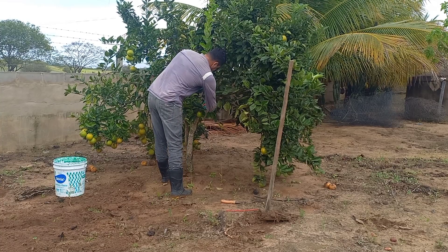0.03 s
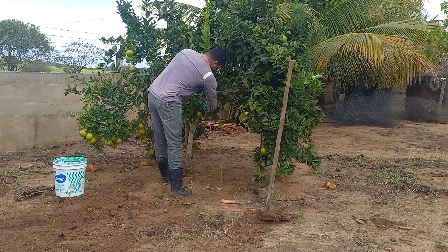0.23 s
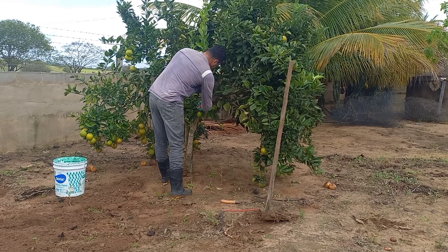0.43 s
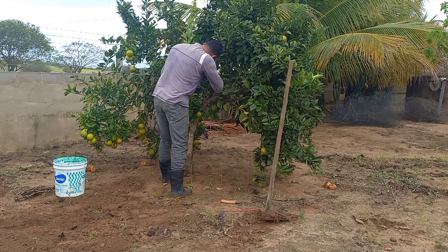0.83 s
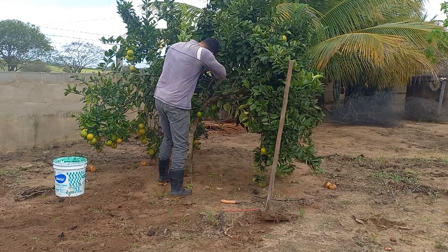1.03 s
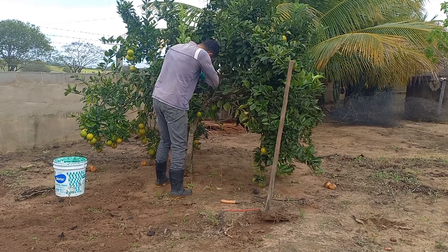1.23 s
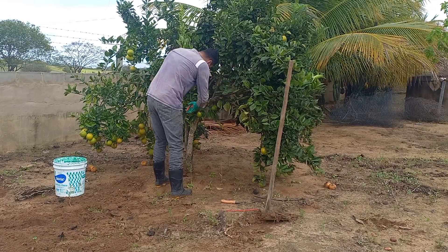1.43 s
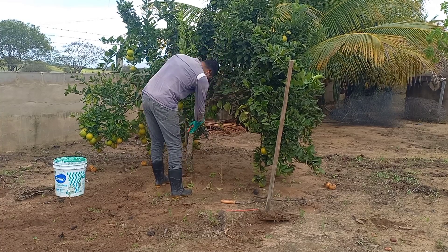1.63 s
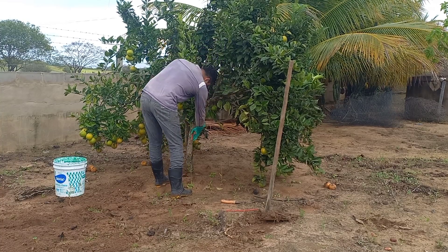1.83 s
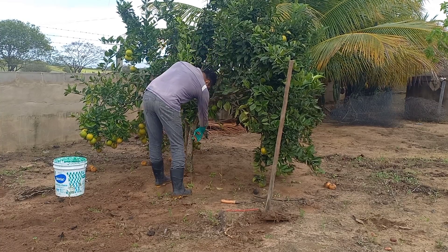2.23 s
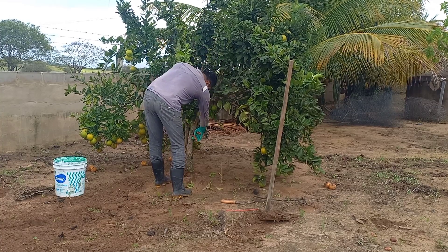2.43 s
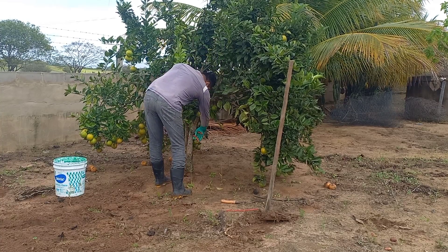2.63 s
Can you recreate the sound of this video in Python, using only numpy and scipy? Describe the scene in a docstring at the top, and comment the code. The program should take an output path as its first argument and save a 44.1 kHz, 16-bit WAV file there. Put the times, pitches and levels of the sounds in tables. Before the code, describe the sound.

A tree branch snaps once with a sharp crack right at the start, echoing briefly in an open yard. Small birds peep faintly throughout, leaves rustle softly near the end, and light wind rumbles on the microphone.

```python
"""A branch snaps once in a yard: its fibres tear, it cracks, and the ground, a wall and the foliage answer.
Leaves tick and rustle as the branch is handled. Small birds, probably chicks, peep all the while,
each note a quick whistle that leaps up and sags back. Light wind rumbles on the two microphone
ports (the openings that let sound in), over a faint hiss of air."""
import sys
import numpy as np
from scipy import signal
from scipy.fft import rfft, irfft, next_fast_len
from scipy.io import wavfile
from scipy.ndimage import uniform_filter1d, map_coordinates

SR = 44100
rng = np.random.default_rng(int(sys.argv[2]) if len(sys.argv) > 2 else 0)


def master(y):
    """Save y as 16-bit WAV."""
    cut = np.clip(np.atleast_2d(y).T, -1, 1)
    pcm = np.round(cut * 32767)  # scale
    wavfile.write(sys.argv[1], SR, pcm.astype(np.int16))


N = 123479

# How strongly the leaves are brushed. Each row: time in seconds, relative level in dB.
RUSTLE_LEVELS = [(.4, -68.5), (1, -73.5), (1.25, -69.5), (1.55, -67.5), (1.8, -70), (2.19, -66.5),
                 (2.24, -63), (2.355, -63), (2.385, -65.5), (2.52, -72), (2.62, -76.5)]
# The tone colours of leaves, still air and wind. Each row: frequency in Hz, relative level in dB.
LEAF_COLOUR = [(500, -6.5), (2000, -4.5), (4500, -0.5), (7000, -1.5), (8600, 3), (10500, 1), (14000, 3),
               (16000, -3.5)]
AIR_COLOUR = [(180, -9.5), (300, 6), (431, -4), (922, -13.5), (1870, -14.5), (2440, -13), (2790, -12),
              (3400, -22.5), (6680, -18), (8700, -18.5), (10300, -28), (13600, -34), (15500, -17.5)]
WIND_COLOUR = [(20, -21), (40, -12.5), (65, 4), (100, 3.5), (160, -9.5), (250, -22), (400, -39),
               (800, -60.5), (2000, -81.5)]
# Stereo width of the background hiss. Each row: frequency in Hz, gain in dB on the difference between left and
# right.
HISS_WIDTH = [(4400, 1.5), (8000, -1.5), (15000, -15.5)]
# Gusts on the left and right port. Each row: time in seconds, relative level in dB.
GUSTS_LEFT = [(0.0, -60), (0.26, -46.5), (0.39, -64), (0.5, -40.5), (0.73, -61.5), (1.29, -58.5),
              (1.5, -48), (1.65, -59.5), (1.99, -56), (2.03, -33), (2.09, -50.5), (2.16, -36.5),
              (2.23, -42), (2.4, -63), (2.79, -59)]
GUSTS_RIGHT = [(0, -73), (.05, -45), (.16, -40), (.39, -53), (.48, -35), (.51, -54), (.545, -35),
               (.61, -36.5), (.65, -47), (.71, -47), (.75, -53.5), (.78, -35.5), (.81, -46), (.85, -33),
               (.92, -49), (.94, -41), (.99, -56.5), (1.09, -35), (1.13, -51), (1.31, -45.5), (1.34, -37.5),
               (1.39, -27), (1.41, -48.5), (1.48, -40), (1.5, -56.5), (1.55, -33), (1.69, -51),
               (1.74, -42.5), (1.83, -48.5), (1.91, -50.5), (1.955, -31), (2, -30), (2.05, -43.5),
               (2.07, -32), (2.14, -44), (2.29, -29.5), (2.31, -39.5), (2.34, -34.5), (2.37, -59),
               (2.39, -28.5), (2.46, -50), (2.49, -27.5), (2.53, -34), (2.61, -51), (2.67, -42.5),
               (2.79, -47)]
# The near birds' notes. Each row: start in seconds, length in seconds, top pitch in Hz,
# relative level in dB, swell from the middle to the end in dB.
PEEPS = [(.005, 0.09, 3580, -62, 0.5), (.095, .088, 3876, -60, 1), (.3, 0.065, 3500, -53.5, -2),
         (.408, 0.053, 2750, -59, -4), (.482, .066, 3180, -58.5, 1), (.584, 0.065, 3210, -63, -4),
         (.662, 0.068, 3640, -58.5, 0), (.765, 0.1, 3740, -61, -1.5), (.857, 0.099, 3940, -55.5, 1),
         (.95, 0.082, 3730, -56.5, 2), (1.07, 0.1, 3843, -58.5, 0), (1.135, 0.067, 3060, -57, 4.5),
         (1.275, 0.047, 3160, -57, 4), (1.317, 0.062, 2840, -51.5, 2), (1.5, 0.072, 3336, -55.5, -1.5),
         (1.695, 0.083, 3660, -63.5, 3), (1.895, 0.11, 3920, -66, 2), (1.93, 0.022, 2626, -56.5, 5),
         (2.09, 0.088, 3500, -68, -1), (2.295, 0.076, 3340, -61.5, 5), (2.485, 0.084, 2870, -66, 0),
         (2.7, 0.07, 3200, -76.5, 0.5)]
# The pitch path of a peep. Each row: share of its length, share of its pitch rise.
PEEP_SHAPE = [(0, 0), (.13, .45), (.29, .92), (.43, 1), (.6, .92), (.78, .48), (1, .15)]
# The tone colour of the birds' voices. Each row: frequency in Hz, gain in dB.
PEEP_COLOUR = [(1400, -29), (1650, -24), (1830, -12.5), (2000, -20.5), (2400, -16), (2750, -5), (3050, -12),
               (3300, -16.5), (3700, -10), (4000, -14)]
# How long the yard rings. Each row: frequency in Hz, seconds to fade by 60 dB (called T60).
YARD_DECAY = [(200, 0.31), (1000, 0.31), (2500, 0.23), (5000, .22), (15000, 0.19)]
# The tone colour of that ringing. Each row: frequency in Hz, relative level in dB.
YARD_COLOUR = [(200, 14), (500, 13), (1200, -3), (3000, -3.5), (8000, -5.5), (15000, 0.5)]
# Twig and leaf ticks. Each row: start in seconds, level in dB, centre frequency in Hz,
# width in octaves, T60 in seconds.
TICKS = [(.048, -53, 7500, 0.2, 0.034), (.064, -58.5, 6900, 0.16, 0.022), (.086, -60.5, 8300, 0.44, 0.069),
         (.165, -68, 8540, 0.15, 0.026), (0.284, -46, 1806, 0.14, 0.016), (0.681, -66.5, 7800, 0.95, 0.059),
         (1.547, -62, 1990, 1.3, 0.057), (2.325, -52, 11000, 2, 0.13)]
# The tone colour of tearing fibres. Each row: frequency in Hz, relative level in dB.
TEAR_COLOUR = [(1000, -1.0), (3500, -6), (12000, 7.5)]
# Bundles of fibres part one after another. Each row: time in seconds, strength in dB.
FIBRE_BREAKS = [(.2091, -12), (.2095, -4.5), (.2107, -11)]
# The resonances of the breaking wood. Each row: frequency in Hz, relative level in dB.
WOOD_COLOUR = [(180, -26), (300, -22), (500, -24), (800, -26), (1050, -11.5), (1300, -16), (1550, -6),
               (1800, -5), (2100, -14), (2600, -1), (3800, 1), (4450, -2), (5400, 2), (6550, -7.5),
               (7750, 3.5), (8250, 0.5), (8680, 4), (9100, -1.5), (11700, -4), (12500, -2), (13600, -7.5),
               (15000, -3), (16000, -7.5)]
# The snap's timing at the two ports. Each row: frequency in Hz, lead of the left in radians.
PORT_PHASE = [(2500, -1), (3500, -.2), (4500, 1.5), (5600, 1.5), (10000, .5), (16000, .1)]
# The snap's balance at the two ports. Each row: frequency in Hz, left minus right in dB.
PORT_BALANCE = [(450, 3), (3000, 2), (5500, 2), (9000, -1.2), (15000, 1)]
# Echoes of the snap. Each row: delay in seconds, left gain in dB, right gain in dB.
ECHOES = [(.0142, -14, -18), (.03, -30, -27.5), (.037, -28, -39)]

SNAP_S, SNAP_DB = .2091, -13.5


def amp(db):
    """Turn decibels into a gain to multiply by."""
    return 10 ** (np.asarray(db) / 20)


def unit(x):
    """Scale a signal to an average (rms) level of 1."""
    return x / np.sqrt(np.mean(x ** 2) + 1e-20)


def along(points, hz):
    """Read between the rows of a (frequency, value) table, on a log frequency axis."""
    freqs, values = np.transpose(points)
    return np.interp(np.log(hz + 1), np.log(freqs + 1), values)


def clock():
    """The time of every sample in seconds."""
    return np.arange(N) / SR


def curve(rows):
    """Join (time, value) rows with straight lines, one value per sample."""
    return np.interp(clock(), *np.transpose(rows))


def wobble(rate):
    """A smooth curve through `rate` random values a second."""
    return map_coordinates(rng.standard_normal(1000), [clock() * rate], mode="mirror")


def filtered(x, response):
    """Multiply each frequency in x by the gain that `response` gives for it."""
    size = next_fast_len(N + SR // 2)
    return irfft(rfft(x, size) * response(np.fft.rfftfreq(size, 1 / SR)), size)[..., :N]


def white_noise(side_db):
    """White stereo noise; the lower side_db, the narrower it sounds."""
    mid, side = rng.standard_normal((2, N))
    return unit(np.array([mid + amp(side_db) * side, mid - amp(side_db) * side]))


def coloured_noise(colour, side_db):
    """Stereo noise shaped by a tone colour table."""
    return unit(filtered(white_noise(side_db), lambda hz: amp(along(colour, hz))))


def band_noise(centre_hz, octaves, side_db):
    """Stereo noise in a bell-shaped band around one frequency."""
    noise = white_noise(side_db)
    return unit(filtered(noise, lambda hz: np.exp(-.5 * (np.log2((hz + 1) / centre_hz) / octaves) ** 2)))


def fade(t, t60):
    """Silence before time zero, then a fall of 60 dB every t60 seconds."""
    return (t >= 0) * amp(-60 * np.abs(t) / t60)


def leaves():
    """Foliage brushes softly against the moving branch."""
    level_db = curve(RUSTLE_LEVELS) - 4.5 + 1.3 * wobble(rate=120)
    return amp(level_db) * coloured_noise(LEAF_COLOUR, side_db=-7.5)


def hiss():
    """The background hiss sounds wide in the middle range and nearly mono in the highest treble."""
    air = amp(-72.5) * coloured_noise(AIR_COLOUR, side_db=-1)
    left, right = leaves() + air
    mid = (left + right) / 2
    side = filtered((left - right) / 2, lambda hz: amp(along(HISS_WIDTH, hz)))
    return np.array([mid + side, mid - side])


def wind(low_cut_hz=51.3):
    """Gusts rumble on each port, mostly the right; the strongest add a higher flutter."""
    gust_db = np.array([curve(GUSTS_LEFT), curve(GUSTS_RIGHT)])
    eddies = coloured_noise(WIND_COLOUR, side_db=-1)
    power = uniform_filter1d(uniform_filter1d(eddies ** 2, size=700), size=700)
    eddies /= np.sqrt(np.abs(power) + 0.027)  # even out the noise so the gusts set its level
    flicker_db = 2.5 * np.array([wobble(rate=35), wobble(rate=36.12)])
    rumble = amp(gust_db - 3 + flicker_db) * eddies
    flutter = amp(-77) * unit(amp(1.3 * gust_db)) * band_noise(248.3, octaves=8 ** -.5, side_db=1.5)
    return filtered(rumble + flutter, lambda hz: 1 - 1 / (1 + (hz / low_cut_hz) ** 6))


def peeps(notes, pitch_blur, base_hz=2480, firm_db=-54):
    """Birds whistle a second harmonic over a faint fundamental; weak notes break up and thin at the top."""
    t = clock()
    out = np.zeros(N)
    for start, length, top_hz, db, swell_db in notes:
        during = np.flatnonzero((t > start) & (t < start + length))
        progress = np.clip((t[during] - start) / length, 0, 1)
        quiver = map_coordinates(rng.standard_normal(100), [45 * progress])
        flicker = map_coordinates(rng.standard_normal(100), [14 * progress])
        frailty = np.clip((firm_db - db) / 7, .15, 1)  # 1 for the weakest notes
        rise = np.interp(progress, *np.transpose(PEEP_SHAPE))
        hz = base_hz + (top_hz - base_hz) * rise
        hz *= 1 + pitch_blur * (.3 + 2 * frailty * rise) * quiver
        phase = 2 * np.pi * np.cumsum(hz) / SR
        harmonic = amp(along(PEEP_COLOUR, hz) - 7 * frailty * rise ** 2) * np.sin(phase)
        fundamental = amp(along(PEEP_COLOUR, hz / 2) - 5) * np.sin(phase / 2)
        level_db = db + swell_db * (2 * progress - 1) + 4 * frailty * flicker
        soft_ends = np.clip(10 * np.minimum(progress, 1 - progress), 0, 1)
        out[during] += amp(level_db) * soft_ends * (harmonic + fundamental)
    return out


def flock(until_s=2.3, note_s=0.045, level_db=-74.5):
    """The rest of the flock peeps far off, at random times and pitches."""
    notes = [(until_s * when, note_s, 2820 * (0.82 + 0.24 * pitch), level_db, 0)
             for when, pitch in rng.random(size=(24, 2))]
    return peeps(notes, pitch_blur=0.042)


def yard(x):
    """Sound scatters quickly off the foliage and rings on a little longer in the yard."""
    hz, frame_s, bands = signal.stft(white_noise(side_db=-1)[:, :SR // 2], SR, nperseg=256)
    hz = hz[:, None]
    bands *= fade(frame_s, along(YARD_DECAY, hz)) * amp(along(YARD_COLOUR, hz))
    _, tail = signal.istft(bands, SR, nperseg=256)
    t = np.arange(tail.shape[1]) / SR
    scatter = white_noise(side_db=-1)[:, :len(t)] * fade(t, t60=0.12)
    response = amp(-2) * tail / np.linalg.norm(tail[0]) + amp(-11) * scatter / np.linalg.norm(scatter[0])
    build_up = 1 - np.exp(-t / 0.0022)
    return signal.fftconvolve(x[None], response * build_up, axes=1)[:, :N]


def ticks():
    """Twigs and leaves tick: a crisp click over a wide band, then a ring in a narrower one."""
    out = np.zeros((2, N))
    for start, db, hz, octaves, t60 in TICKS:
        t = clock() - start
        click = amp(-4) * band_noise(hz, 2 * octaves, side_db=-2) * fade(t, t60=.006)
        ring = band_noise(hz, octaves, side_db=-2) * fade(t, t60)
        out += amp(db) * (click + ring)
    return out


def wood_ring(size=2048):
    """The short ring of the wood after one sharp blow."""
    gains = amp(along(WOOD_COLOUR, np.fft.rfftfreq(size, 1 / SR)))
    cepstrum = irfft(np.log(gains))
    folded = np.r_[cepstrum[0], 2 * cepstrum[1:size // 2]]  # so nothing rings before the blow
    ring = irfft(np.exp(rfft(folded, size)))
    return ring / np.linalg.norm(ring)


def snap():
    """Fibres tear, the branch cracks bundle by bundle, and splinters follow; the wood colours it all."""
    t = clock() - SNAP_S
    crack = amp(-6) * fade(t, t60=0.0038) * white_noise(side_db=-10.5)
    tear = amp(-18) * fade(-t, t60=.012) * coloured_noise(TEAR_COLOUR, side_db=-5.5)  # swells to the crack
    splinters = amp(-5.5) * fade(t, t60=0.019) * white_noise(side_db=-13) * amp(1.6 * wobble(rate=1500))
    force = amp(SNAP_DB) * (crack + tear + splinters)
    for start, db in FIBRE_BREAKS:
        force[:, round(start * SR)] += amp(db)
    return signal.fftconvolve(force, wood_ring()[None], axes=1)[:, :N]


def snap_into_yard():
    """The snap as the yard receives it: one blow with the colour of the wood."""
    blow = np.zeros(N)
    blow[round(SNAP_S * SR)] = amp(2)
    return signal.fftconvolve(blow, wood_ring())[:N]


def ports(x):
    """Sound from the tree reaches each microphone port with its own phase and level."""
    half = np.array([[.5], [-.5]])  # left and right are pushed opposite ways
    return filtered(x, lambda hz: amp(half * along(PORT_BALANCE, hz))
                    * np.exp(1j * half * along(PORT_PHASE, hz)))


def echoes(x):
    """The wall and sheds throw back delayed, quieter copies."""
    return filtered(x, lambda hz: sum(amp([[left_db], [right_db]]) * np.exp(-2j * np.pi * hz * delay)
                                      for delay, left_db, right_db in ECHOES))


def scene():
    """The snap and its echoes over birds, leaves, air and wind."""
    branch = ports(snap())
    birds = peeps(PEEPS, pitch_blur=.012) + flock()
    reverb = yard(snap_into_yard() + amp(5) * birds)
    return branch + echoes(branch) + birds + reverb + ticks() + hiss() + wind()


def record(dry, top_hz=16000):
    """Cut away the very highest treble."""
    return filtered(dry, lambda hz: np.clip((top_hz - hz) / 200 + .5, 0, 1))


dry = scene()
out = record(dry)
master(out)
```